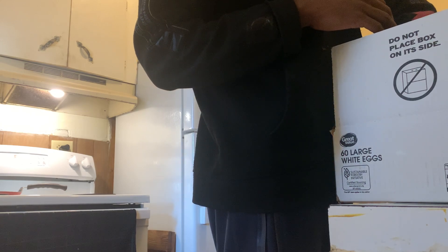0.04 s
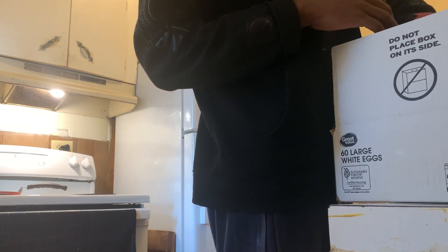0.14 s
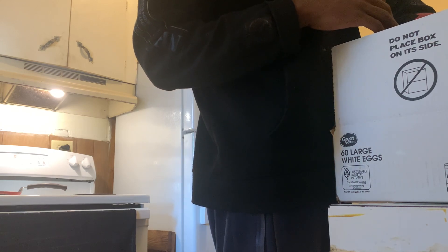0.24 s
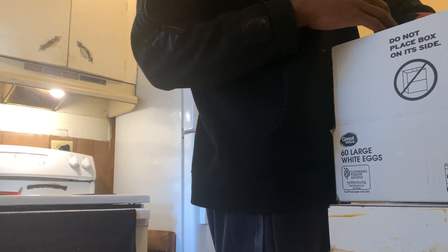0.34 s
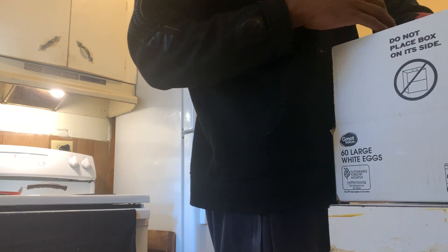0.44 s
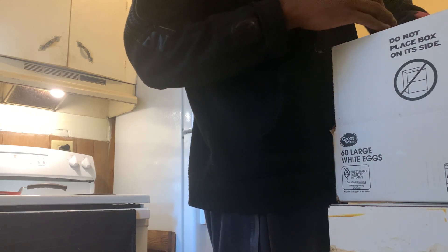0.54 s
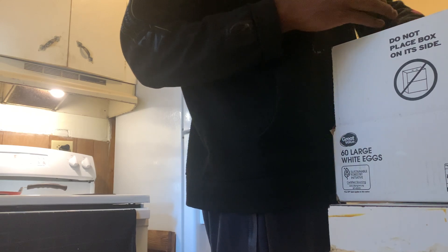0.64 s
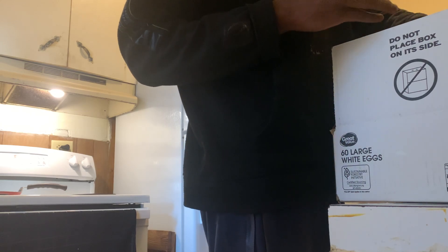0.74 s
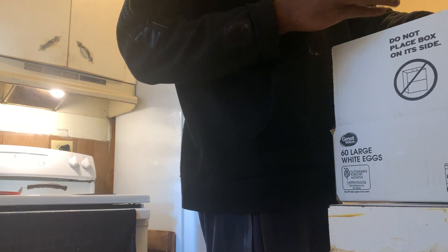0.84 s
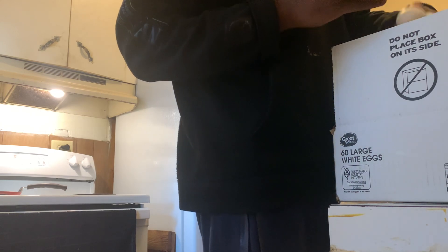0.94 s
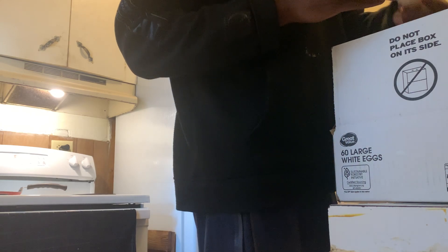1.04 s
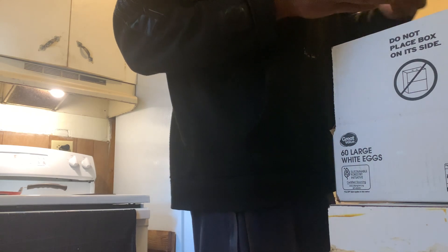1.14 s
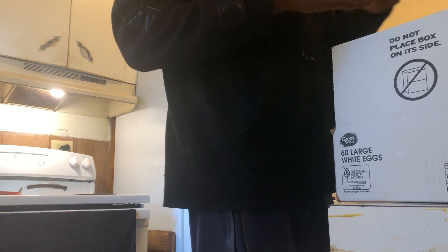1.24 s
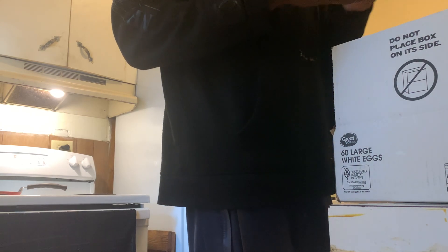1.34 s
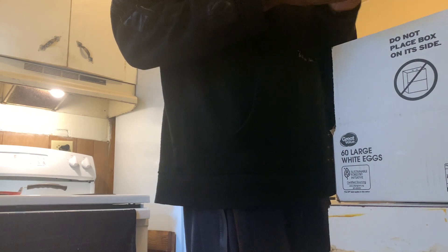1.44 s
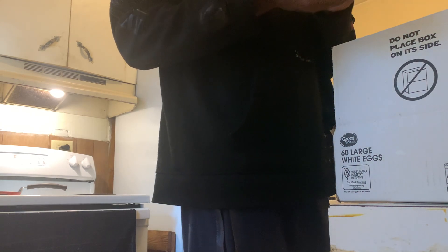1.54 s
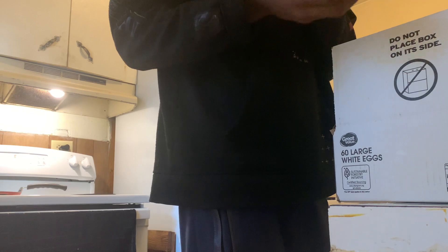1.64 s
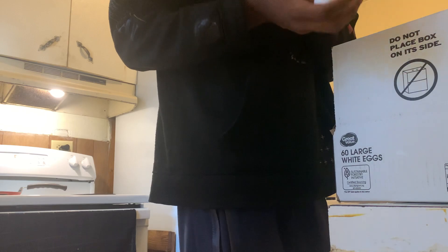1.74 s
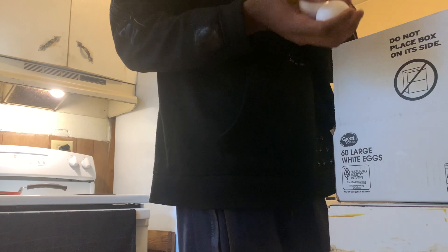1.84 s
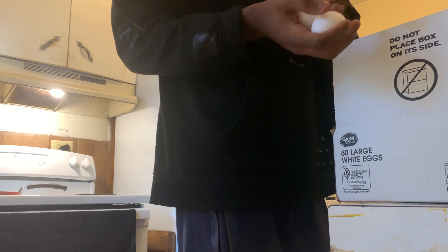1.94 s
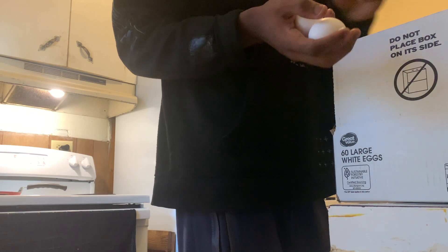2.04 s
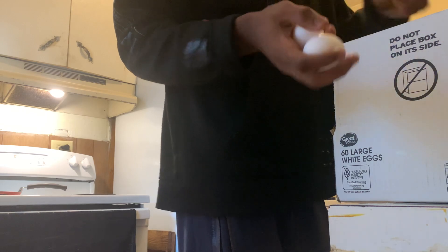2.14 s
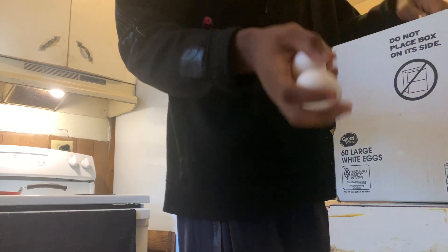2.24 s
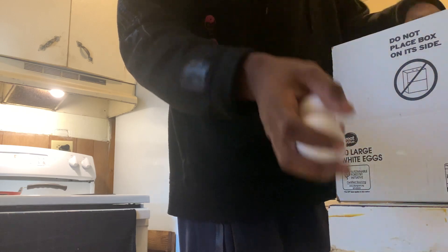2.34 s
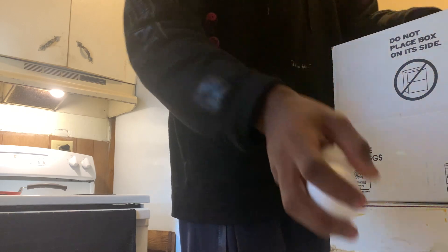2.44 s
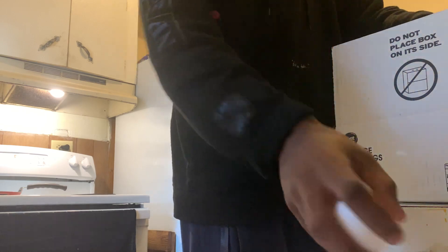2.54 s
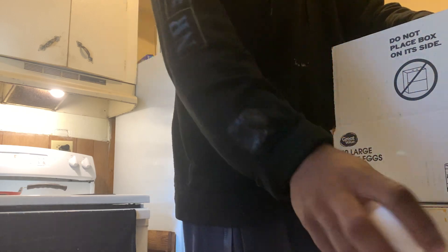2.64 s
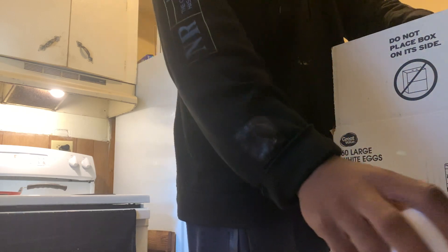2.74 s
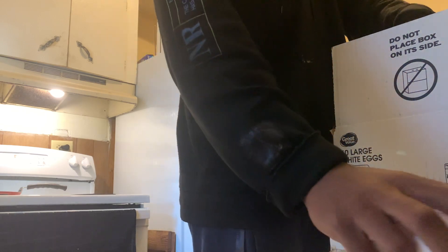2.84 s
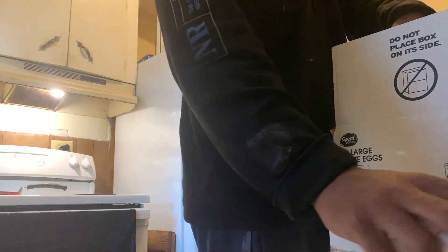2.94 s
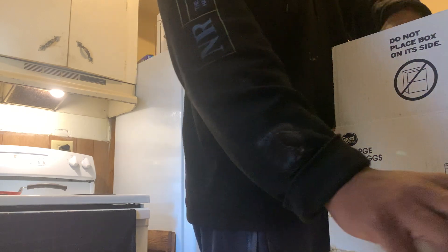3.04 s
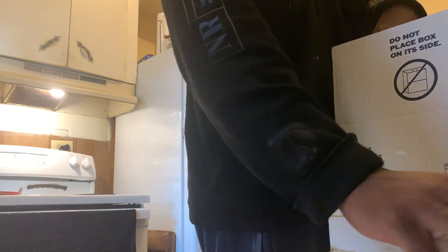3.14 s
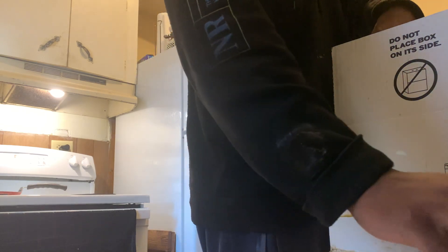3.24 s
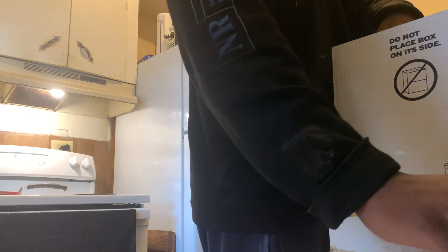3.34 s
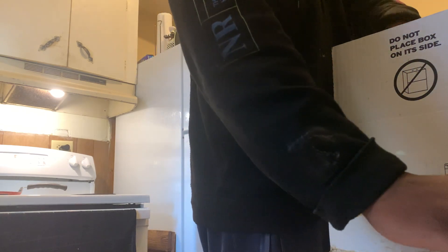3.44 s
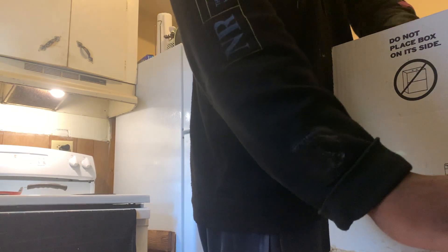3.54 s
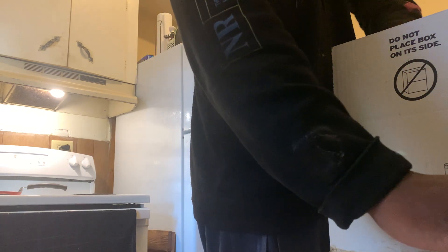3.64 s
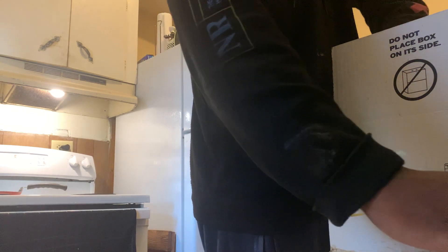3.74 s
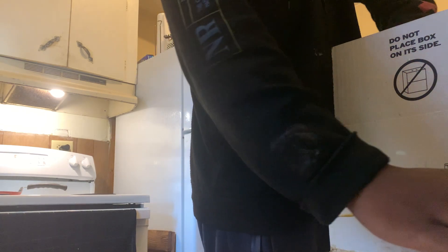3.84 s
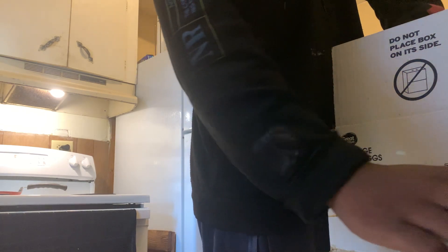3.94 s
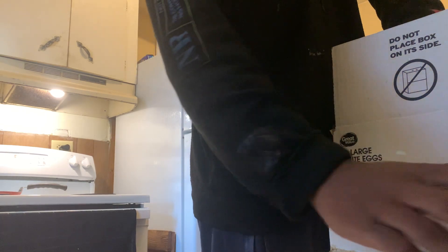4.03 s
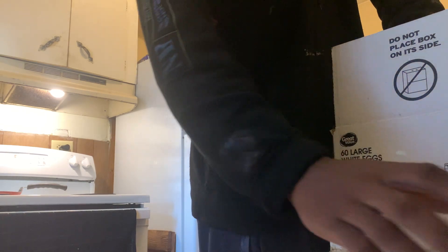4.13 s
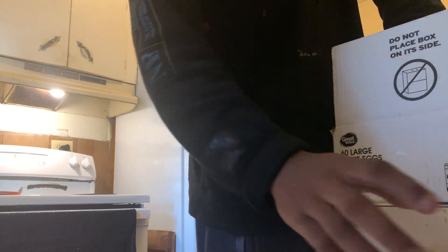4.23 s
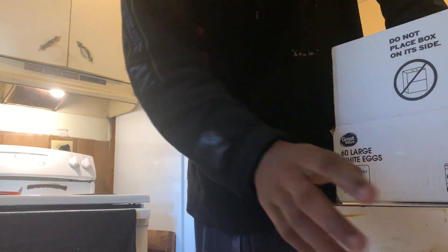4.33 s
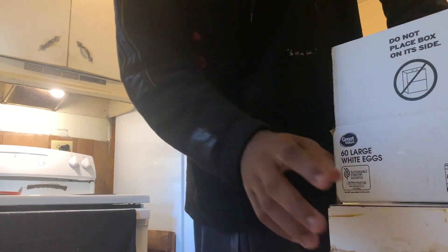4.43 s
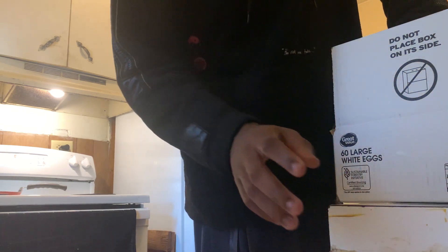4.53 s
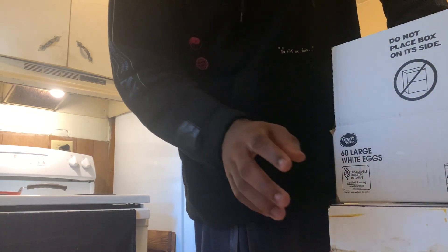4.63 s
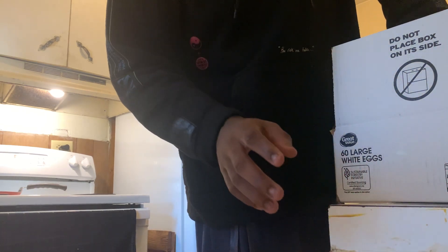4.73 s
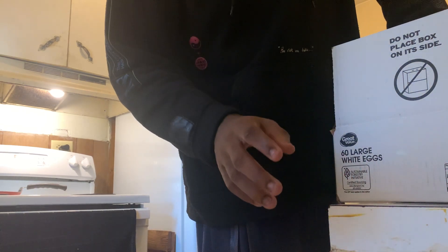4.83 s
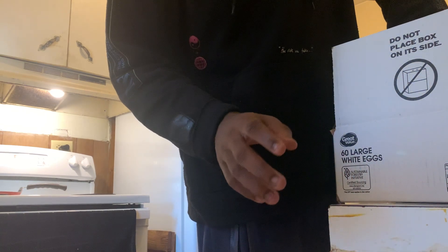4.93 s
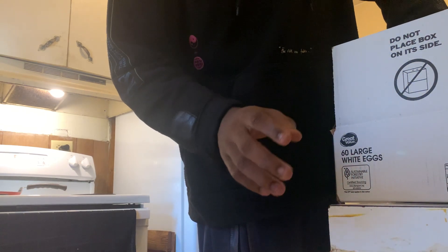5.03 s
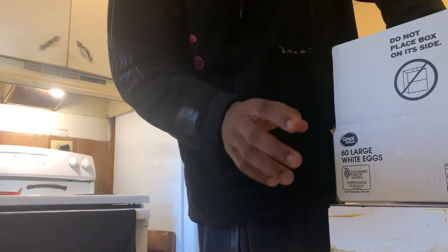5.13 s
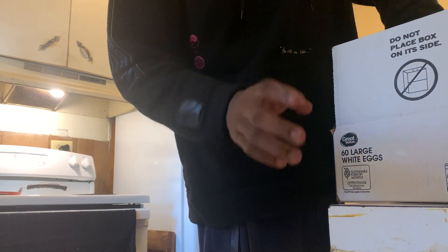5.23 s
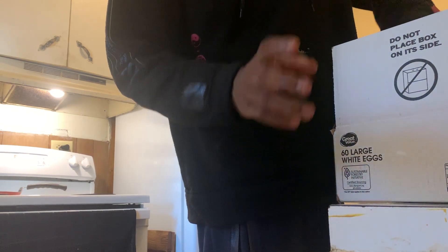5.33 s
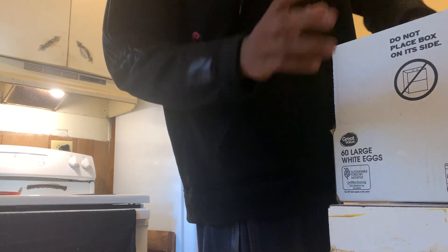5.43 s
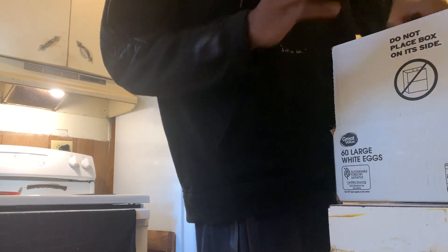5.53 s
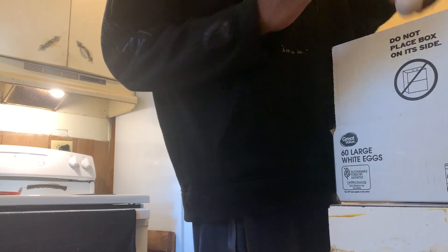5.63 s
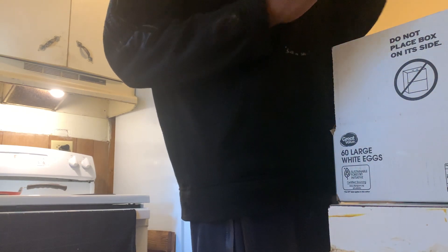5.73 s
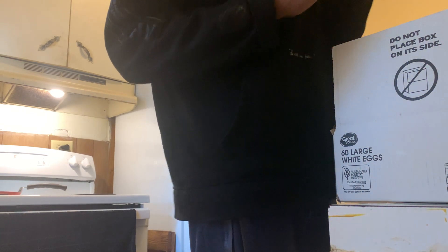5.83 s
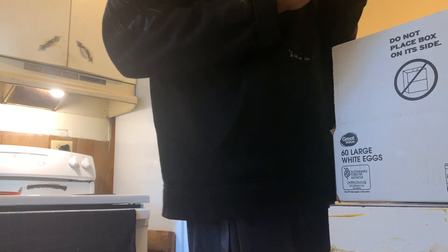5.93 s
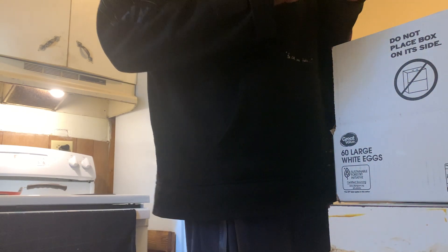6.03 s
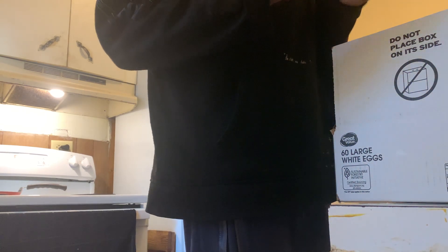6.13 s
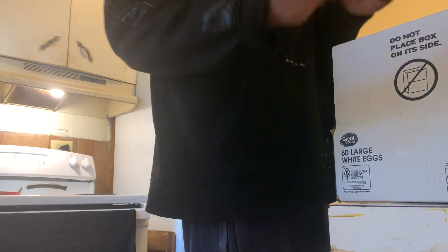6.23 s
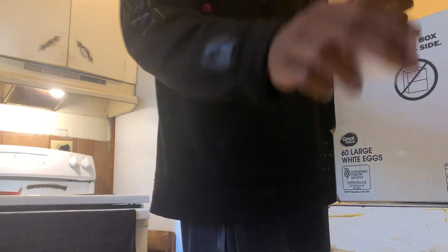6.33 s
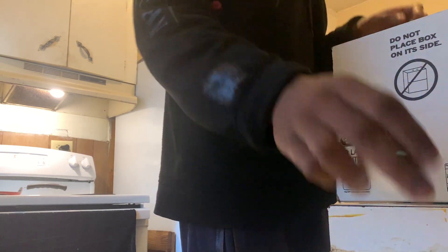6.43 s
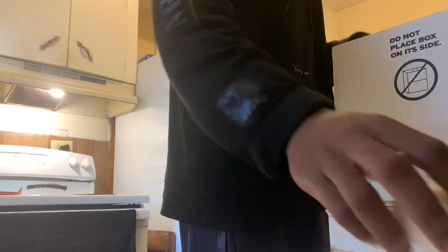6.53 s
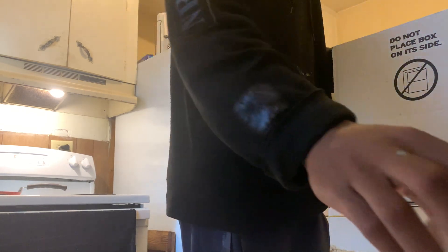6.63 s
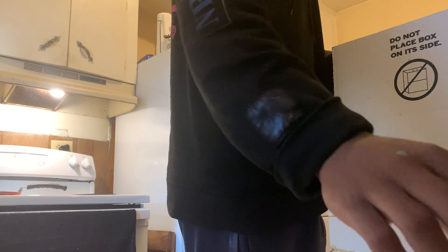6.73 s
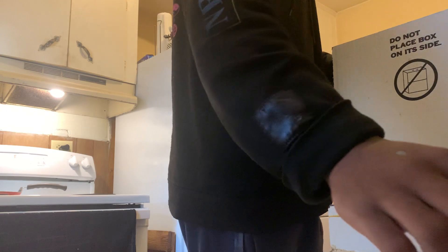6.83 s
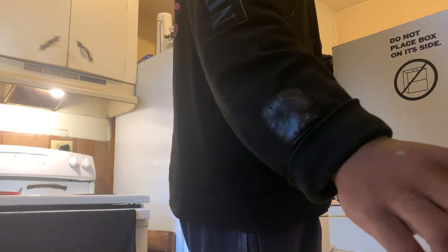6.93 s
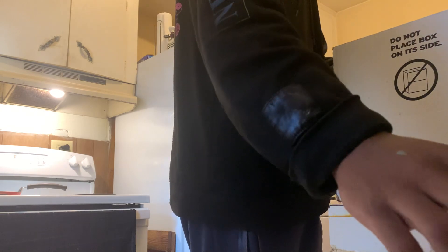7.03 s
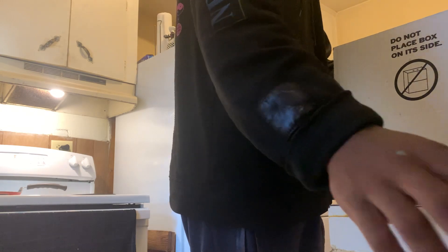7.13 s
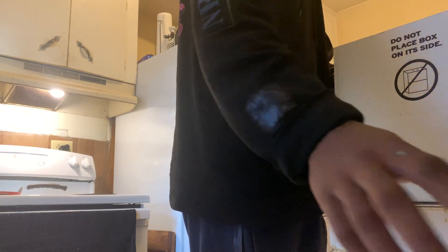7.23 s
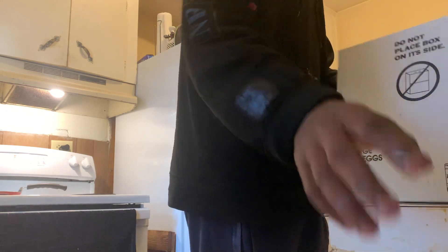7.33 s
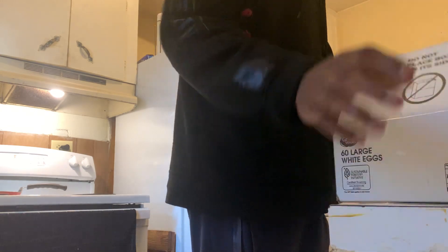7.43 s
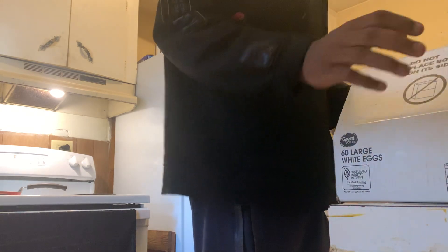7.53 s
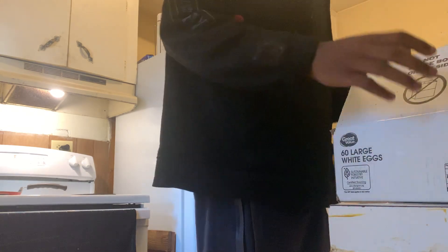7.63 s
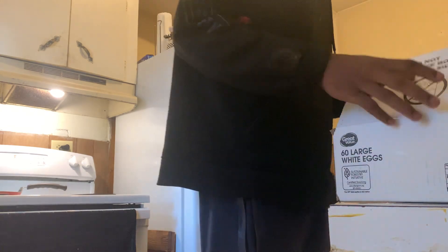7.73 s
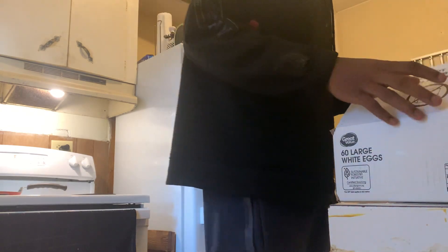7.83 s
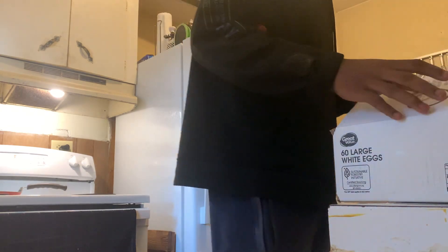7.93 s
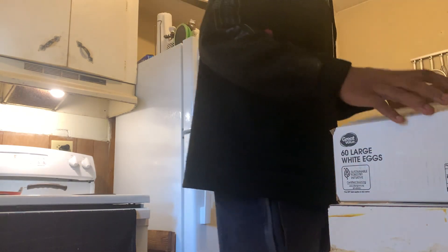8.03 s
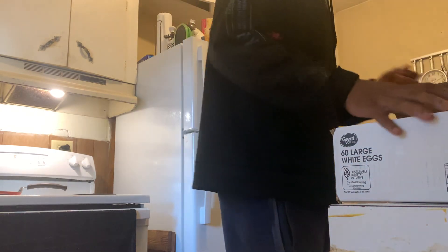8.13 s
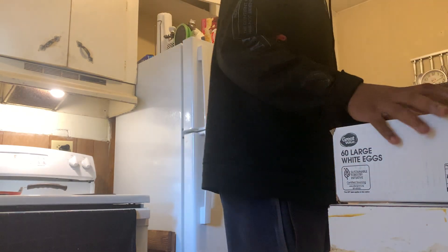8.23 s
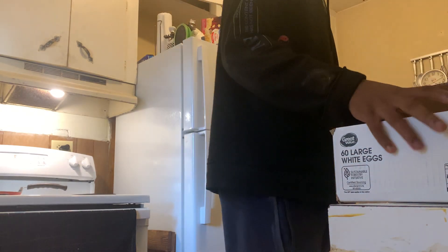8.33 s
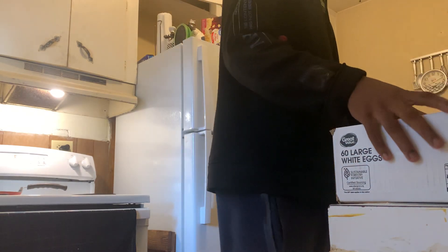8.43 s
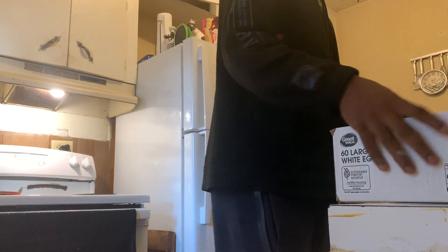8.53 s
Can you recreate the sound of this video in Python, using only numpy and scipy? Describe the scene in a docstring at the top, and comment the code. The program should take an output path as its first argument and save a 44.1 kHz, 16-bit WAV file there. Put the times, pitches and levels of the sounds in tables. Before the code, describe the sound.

Close stereo pickup on a counter, little room echo. Low fridge hum stays underneath. A brief cardboard bump and rustle, near quiet, a tiny eggshell clink, then crisp rubbing with a squeaky groan and a woody egg knock. Soft sleeve and hand brushes fill the middle. A harder knock comes next, followed by coarse scrapes, low cardboard thuds, clicks and a final airy rub.

```python
"""A refrigerator hums throughout in a small kitchen, as wavering sine tones over a soft rush of noise.
From the start, hand, sleeve and shells rub a cardboard egg case close by: gritty noise that swells and dies.
Eggs clink in the hand, then a long groan of nearly regular slips leads to an egg knocking on the counter.
After quieter rubs a second egg knocks harder; both knocks are sets of fading counter tones.
Last, the flaps are folded shut with more rubs, short groans, bumps, clicks and low rumble."""
import sys
import numpy as np
from scipy import signal
from scipy.fft import rfft, irfft
from scipy.io import wavfile
from scipy.ndimage import uniform_filter1d, minimum_filter1d

SR = 44100
rng = np.random.default_rng(int(sys.argv[2]) if len(sys.argv) > 2 else 0)


def int16_out(signal):
    """Quantize to a 16-bit WAV file."""
    q = np.round(np.clip(np.atleast_2d(signal).T, -1, 1) * 32767)
    wavfile.write(sys.argv[1], SR, q.astype(np.int16))


N = 377916
TIME = np.arange(N) / SR  # seconds
FREQS = np.fft.rfftfreq(N, 1 / SR)  # Hz

# Levels in the tables are relative: the functions may add a gain or a wavering.

# Refrigerator tones: [pitch_hz, level_db]
HUM_TONES = [(59.5, -63.5), (91.5, -72.5), (119.6, -58.5), (547, -77)]
# Colour of the room's rush: [frequency_hz, level_db]
ROOM_AIR_COLOUR = [(20, -11.5), (40, -11.5), (62, 2.5), (100, 2.5), (150, -1), (250, -21.5), (550, -18.5),
                   (900, -21.5), (1400, -34.5), (3000, -39.5), (7600, -45.5), (8400, -44), (14000, -40),
                   (16000, -48.5)]
# Likeness of left and right in noisy sound: [frequency_hz, likeness (-1 to 1)]
LEFT_RIGHT_LIKENESS = [(300, 1), (600, 1), (850, 0.93), (1130, 0.3), (1700, 0.28), (2500, .4),
                       (3300, -0.047), (4000, 0.21), (5300, -0.22), (6800, 0.46), (8400, 1), (13000, .94),
                       (16000, .8)]

# Pushes that bend the case and its trays: [start_s, length_s, rumble_db]
CASE_PRESSES = [(0.609, 0.066, -40.5), (0.69, 0.68, -51.5), (2.728, 0.51, -54.5), (2.96, .1, -53),
                (3.528, 0.076, -42.5), (3.688, 0.35, -52.5), (4.115, 0.36, -60.5), (4.752, .65, -64),
                (6.773, 0.4, -43.5), (7.32, 0.18, -42.5), (7.52, 0.085, -50), (7.698, .1, -46.5),
                (7.85, 0.67, -51.5)]
# Colour of the bending: [frequency_hz, level_db]
RUMBLE_COLOUR = [(25, -33.5), (45, 0), (70, 7.5), (110, 0), (190, 0.5), (260, -2), (350, -2), (560, -9),
                 (900, -18), (1400, -32.5), (3000, -67)]
PRESS_ATTACK_S, PRESS_RELEASE_DB_PER_S = 0.0098, 197

# Hand against the case: [start_s, level_db, contact_cutoff_hz, share_of_free_ring_time]
CASE_BUMPS = [(.619, -30.5, 1760, 0.89), (.6352, -23.5, 1390, 1), (.658, -27.5, 1200, 0.83),
              (7.394, -28, 1190, 0.66), (7.4505, -31, 1300, 0.49), (7.7525, -33, 2350, 0.3),
              (7.775, -36, 700, 0.32)]
# Ringing of the case wall: [pitch_hz, level_db, free_time_to_fall_60_db_s]
CASE_MODES = [(82.5, -19.5, 0.2), (209, -2.5, 0.22), (358, -26.5, 0.12), (480, -14, 0.066),
              (598, -13.5, 0.36), (830, -22, 0.053), (1234, -27, 0.3), (1450, -31, 0.17)]

# Fibres snapping as a rub starts or a flap bends: [start_s, start_level_db, time_to_fall_60_db_s]
FIBRE_TICKS = [(.0405, -45.5, 0.021), (.055, -41.5, 0.032), (.612, -41.5, 0.1), (1.43, -66, .08),
               (2.7326, -44, .023), (5.345, -56, 0.042), (5.501, -50, .04), (6.591, -46, 0.05),
               (6.67, -40, .04), (6.769, -28, 0.0061), (7.752, -45, 0.0057), (7.7734, -40, 0.011),
               (7.926, -44, 0.013), (7.95, -42, .014), (7.9985, -33, 0.0073), (8.016, -38, 0.0067)]
# Colour of the snaps: [frequency_hz, level_db]
CLICK_COLOUR = [(600, -13), (1900, -8), (3000, -7), (7400, -6), (10800, 17), (16000, -26)]
# Eggs touching in the hand: [start_s, start_level_db, time_to_fall_60_db_s]
EGG_CLINKS = [(1.8478, -33, 0.021), (1.8688, -35, 0.014), (1.8775, -46, .016), (1.887, -44, .03)]
# Colour of eggshell: [frequency_hz, level_db]
SHELL_COLOUR = [(1200, -19), (1900, -15), (3000, -24), (5200, -1), (7400, -8), (10800, 6.5), (16000, -6)]

# Short scuffs of shell on board: [middle_s, length_s, peak_level_db]
SHELL_SCUFFS = [(2.828, 0.05, -39.5), (2.964, .025, -45.5)]
# Colour of the scuffs: [frequency_hz, level_db]
SCUFF_COLOUR = [(300, -10), (500, 9), (720, -20), (930, 6), (1500, -25), (1850, 9.5), (2300, -29),
                (6000, -27)]

# Long groan before the first egg lands: [time_s, pitch_hz, level_db]
LONG_GROAN_PATH = [(3.17, 378, -40), (3.188, 384.2, -37.5), (3.28, 457.5, -31.5), (3.296, 456.8, -32),
                   (3.354, 365, -26), (3.388, 382.4, -46), (3.42, 373, -40.5), (3.438, 356, -32.5),
                   (3.5, 392, -41)]
# Short stick-slip groans: [middle_s, pitch_hz, level_db]
SHORT_GROANS = [(2.992, 349, -38.5), (3.026, 355.5, -35.5), (3.675, 299, -38), (4.575, 346, -53),
                (6.929, 298, -35.5), (7.157, 350.6, -31.5), (7.353, 398, -33.5), (7.387, 342, -33.5),
                (7.456, 360, -34), (7.588, 319, -34.5), (7.989, 303, -43.5), (8.328, 287, -44.5)]
# Colour of uneven slipping around the groans: [frequency_hz, level_db]
CHATTER_COLOUR = [(210, -29), (320, 1.5), (470, 1), (640, -17.5), (1500, -47)]
LONG_GROAN_GAIN_DB, SHORT_GROAN_S = -0.5, .054
# The long groan swells in regular surges, one of them peaking at SURGE_AT_S
SURGES_PER_S, SURGE_AT_S, SURGE_DB = 28, 3.348, 3.5

# Strokes of hand, sleeve or shell: [start_s, length_s, attack_s, fine_hiss_db, coarse_scrape_db]
RUB_STROKES = [(0.009, 0.038, 0.04, -53, -63), (0.602, 0.073, 0.041, -46.5, -49.5),
               (0.731, 0.055, 0.045, -41.5, -45), (2.619, .11, .012, -61, -76),
               (2.731, 0.22, 0.035, -36.5, -55), (2.948, 0.094, 0.026, -39, -44),
               (3.049, 0.034, 0.0089, -33, -38.5), (3.092, 0.16, 0.015, -43.5, -54),
               (3.261, 0.28, 0.13, -50.5, -54), (3.51, .19, 0.018, -44, -49),
               (3.75, 0.2, 0.016, -65.5, -66.5), (3.89, 0.12, 0.019, -55, -60),
               (4.016, 0.28, 0.13, -52, -70.5), (4.295, 0.063, 0.049, -54, -61),
               (4.603, 0.022, .017, -65, -71), (4.76, 0.071, .035, -68.5, -71),
               (4.965, 0.22, 0.12, -56, -69.5), (5.188, 0.079, 0.026, -75, -65.5),
               (5.338, 0.066, 0.021, -41.5, -53.5), (5.483, 0.049, 0.019, -53, -60),
               (6.444, 0.02, .023, -66, -94), (6.576, 0.038, 0.023, -43.5, -59),
               (6.659, 0.12, 0.0063, -45, -58), (6.765, 0.17, 0.023, -40, -46),
               (6.916, .21, 0.025, -37, -42), (7.199, 0.17, 0.1, -36, -39.5), (7.489, .065, 0.1, -48, -55),
               (7.665, 0.046, .018, -71, -71), (7.753, 0.82, 0.019, -54.5, -64.5),
               (8.106, 0.065, 0.053, -42.5, -63.5), (8.334, 0.1, .018, -47, -59),
               (8.431, 0.19, 0.15, -36.5, -68)]
# Colour of the fine hiss: [frequency_hz, level_db]
HISS_COLOUR = [(5500, -26), (7700, -26.5), (8200, -3.5), (8900, -0.5), (9800, 0), (11500, 1.5),
               (12500, -1.5), (14000, -7), (15200, -13.5), (16000, -53.5)]
# Colour of the coarse scrape: [frequency_hz, level_db]
SCRAPE_COLOUR = [(40, -22), (150, -1), (300, -2), (600, -2), (780, -3.5), (950, 2), (1120, -6),
                 (1270, -8.5), (1800, -6), (2200, -7.5), (3100, -12), (4000, -12), (5200, -15.5),
                 (7200, -10), (10000, -22)]
# Sharp resonances of the scraped board: [pitch_hz, width_hz, lift_db]
BOARD_RESONANCES = [(577, 40, 9.5), (901, 38, 4.5), (1254, 65, 8.5), (1436, 22, 8), (1600, 57, -1),
                    (2116, 46, -3)]
RUB_RELEASE_DB_PER_S = 289
# A hand resting on the case never keeps quite still
RESTING_HISS_DB, RESTING_SCRAPE_DB, RESTING_RUMBLE_DB = -83.5, -83.5, -70

# Egg against counter: [start_s, level_db, contact_cutoff_hz, share_of_free_ring_time]
EGG_KNOCKS = [(3.517, -27, 3620, 0.72), (3.5215, -9.5, 895, 0.54), (3.5405, -18.5, 1080, 0.7),
              (3.552, -27, 1200, 0.47), (3.562, -20, 590, 0.38), (6.7665, -23.5, 2400, 0.87),
              (6.7722, -0.5, 805, 0.8), (6.7802, -17, 950, 0.47)]
# Ringing of the counter top: [pitch_hz, level_db, free_time_to_fall_60_db_s]
COUNTER_MODES = [(143, -9, 0.19), (284, -12.5, 0.21), (379, -13, 0.31), (458, -10.5, 0.15),
                 (500, -0.5, 0.071), (497, -4, 0.019), (604, -12.5, 0.12), (654, -19, 0.083),
                 (716, -19, 0.094), (850, -17.5, 0.077), (1265, -16.5, 0.13), (1690, -8, .06)]

KITCHEN_T60_S, KITCHEN_DB = .28, -13.5
PORT_LAG_S, PORT_ONSET_HZ = .0002, 5850
CUTOFF_HZ = 15850


def from_db(db):
    """Turn decibels into a gain."""
    return 10 ** (np.asarray(db) / 20)


def rms_one(x):
    """Scale to an average power of 1."""
    return x / np.sqrt(np.mean(x ** 2) + 1e-20)


def over_freqs(points):
    """Read a table at every frequency, on a log-frequency axis."""
    hz, value = np.transpose(points)
    return np.interp(np.log(FREQS + 1), np.log(hz), value)


def butter(x, hz, kind, order=2):
    """Low- or high-pass filter that uses only present and past sound."""
    sections = signal.butter(order, min(hz, .45 * SR), kind, fs=SR, output="sos")
    return signal.sosfilt(sections, x + 1e-18)


def drift(rate_hz):
    """Smooth random wandering with spread 1; a higher rate wanders faster."""
    noise = rfft(rng.standard_normal(N))
    return rms_one(irfft(noise / (1 + (FREQS / rate_hz) ** 2), N))


def add(out, s, sound):
    """Mix a short sound in at time s."""
    start = max(round(s * SR), 0)
    out[start:start + len(sound)] += sound[:max(N - start, 0)]


def coloured(spectrum, grain=1, resonance_db=0):
    """Stereo noise of rms 1: its driving noise is weighted by grain, then rings through a spectrum."""
    noise = rfft(rng.standard_normal((2, N)) * grain)
    mid, side = noise * from_db(over_freqs(spectrum) + resonance_db)
    side = side * np.minimum(FREQS / 450, 1) ** 2   # long waves reach both microphone ports alike
    alike = np.clip(over_freqs(LEFT_RIGHT_LIKENESS), -1, 1)
    shared = np.sqrt(1 + alike) * mid
    opposed = np.sqrt(1 - alike) * side * [[1], [-1]]
    return rms_one(irfft(shared + opposed, N))


def mode_ripple(count=330):
    """Crowded small modes make a response rise and fall at random along frequency; spread 1."""
    return rms_one(np.interp(FREQS, np.linspace(0, SR / 2, count), rng.standard_normal(count)))


def lagged(x, lag_s, onset_hz):
    """Above the onset the left microphone port lags the right."""
    lag = 2 * np.pi * lag_s * np.maximum(FREQS - onset_hz, 0)  # phase in radians
    return irfft(rfft(x) * np.exp(.5j * lag * np.array([[-1], [1]])), N)


def contacts_db(rows, release_db_per_s, resting_db):
    """Level of overlapping contacts: each swells with pressure, then dies away; their powers add."""
    power = np.full(N, from_db(resting_db) ** 2)
    t = np.arange(2 * SR) / SR
    for start, length, attack_s, db in rows:
        swell = np.minimum(t / attack_s, 1)
        release = from_db(db - release_db_per_s * np.maximum(t - length, 0))
        add(power, start, (swell * release) ** 2)
    return 10 * np.log10(power)


def background(air_db=-56, waver_db=4.5):
    """The refrigerator's wavering hum, made of sine tones, over the low rush of the room."""
    hum = np.zeros(N)
    for hz, db in HUM_TONES:
        level = from_db(db + waver_db * drift(1.7))
        hum += level * np.sqrt(2) * np.sin(2 * np.pi * hz * TIME + rng.uniform(0, 2 * np.pi))
    return hum + from_db(air_db) * coloured(ROOM_AIR_COLOUR)


def flexing(lump_db=2.0, gain_db=3.0):
    """Pushed board gives way in small lumps and rumbles."""
    rows = [(start, length, PRESS_ATTACK_S, db) for start, length, db in CASE_PRESSES]
    level_db = contacts_db(rows, PRESS_RELEASE_DB_PER_S, RESTING_RUMBLE_DB)
    return from_db(level_db + gain_db) * coloured(RUMBLE_COLOUR, from_db(lump_db * drift(34)))


def blows(table, modes, crack_db, low_cut_hz):
    """Blows ring modes; soft contact dulls them, a holding hand shortens them, bass radiates poorly."""
    out, t = np.zeros(N), np.arange(SR // 2) / SR
    for s, db, contact_hz, free in table:
        ring = np.zeros(len(t))
        for hz, level, t60 in modes:
            ring += from_db(level - 60 * t / (t60 * free)) * np.cos(2 * np.pi * hz * t)
        crack = from_db(crack_db - 60 * t / 0.11) * rng.standard_normal(len(t))   # many short high modes
        add(out, s, from_db(db) * butter(ring + crack, contact_hz, "low", order=4))
    return butter(out, low_cut_hz, "high")


def case_bumps():
    """The hand bumps the case and its wall rings."""
    return blows(CASE_BUMPS, CASE_MODES, crack_db=-12, low_cut_hz=30)


def ticks(table, spectrum):
    """Clicks of coloured noise that start at once and fade quickly."""
    envelope, t = np.zeros(N), np.arange(SR // 5) / SR
    for s, db, t60 in table:
        add(envelope, s, from_db(db - 60 * t / t60))
    return envelope * coloured(spectrum)


def fibre_snaps():
    """Cardboard fibres snap with bright clicks."""
    return ticks(FIBRE_TICKS, CLICK_COLOUR)


def shell_clinks():
    """Eggs touch in the hand and their shells click."""
    return ticks(EGG_CLINKS, SHELL_COLOUR)


def scuffs():
    """Brief grazing strokes of shell on board excite a few resonances."""
    envelope = np.zeros(N)
    for s, length, db in SHELL_SCUFFS:
        add(envelope, s - length / 2, from_db(db) * signal.windows.hann(int(length * SR)))
    return envelope * coloured(SCUFF_COLOUR)


def slips(hz, swell, jitter=0.078, octave_db=-19, third_db=-32):
    """A run of nearly regular slips: a wavering pitch with two overtones."""
    waver = rms_one(butter(rng.standard_normal(len(swell)), 110, "low"))
    phase = 2 * np.pi * np.cumsum(hz * (1 + jitter * waver)) / SR
    wave = np.sin(phase) + from_db(octave_db) * np.sin(2 * phase) + from_db(third_db) * np.sin(3 * phase)
    return np.sqrt(2) * swell * wave


def groans(shimmer_db=2.54):
    """One long gliding, surging groan and many short ones that swell and die within a few cycles."""
    times, pitch, level_db = np.transpose(LONG_GROAN_PATH)
    sliding = (TIME > times[0]) & (TIME < times[-1])
    surge_db = SURGE_DB * np.cos(2 * np.pi * SURGES_PER_S * (TIME - SURGE_AT_S))
    long_level = from_db(np.interp(TIME, times, level_db) + LONG_GROAN_GAIN_DB + surge_db)
    out = slips(np.interp(TIME, times, pitch), sliding * long_level)
    swell = signal.windows.tukey(int(SHORT_GROAN_S * SR), .8)
    for s, hz, db in SHORT_GROANS:
        add(out, s - SHORT_GROAN_S / 2, slips(hz, from_db(db) * swell))
    return out * from_db(shimmer_db * drift(82))


def stick_slip(chatter_db=-11, spread_s=0.14):
    """Before, between and after the regular runs the contact slips unevenly."""
    runs = groans()
    nearby_power = uniform_filter1d(runs ** 2, int(spread_s * SR))
    activity = np.sqrt(np.maximum(nearby_power, 0))
    return runs + from_db(chatter_db) * activity * coloured(CHATTER_COLOUR)


def wandering(spectrum, grain, lift_db, ripple_db, wander_hz, count=3):
    """The contact wanders between spots of the board, each of which drives other small modes."""
    shares = [np.exp(2 * drift(wander_hz)) for spot in range(count)]
    sound = np.zeros((2, N))
    for share in shares:
        sound += share * coloured(spectrum, grain, lift_db + ripple_db * mode_ripple())
    return sound / np.linalg.norm(shares, axis=0)  # keeps the power steady


def moving_echo(x, path_s=.0026, swing=0.2144, echo_db=-6):
    """The bounce off the counter lengthens and shortens as the arm moves, sweeping a comb through the sound."""
    delay = path_s * np.exp(swing * drift(.6))
    echo = np.array([np.interp(TIME - delay, TIME, channel) for channel in x])
    return x + from_db(echo_db) * echo


def rubbing(grit_db=2.5, catch_db=1.0, hiss_gain_db=1.0, scrape_gain_db=4.5,
            hiss_ripple_db=4.0, ripple_db=3.0, firm_db=-45, brightening=0.069):
    """Fibres catch and let go: fine hiss and coarse scrape share the grit; a lighter touch scrapes duller."""
    start, length, attack_s, hiss_levels, scrape_levels = np.transpose(RUB_STROKES)
    hiss_rows = zip(start, length, attack_s, hiss_levels)
    scrape_rows = zip(start, length, attack_s, scrape_levels)
    hiss_db = contacts_db(hiss_rows, RUB_RELEASE_DB_PER_S, RESTING_HISS_DB)
    scrape_db = contacts_db(scrape_rows, RUB_RELEASE_DB_PER_S, RESTING_SCRAPE_DB)
    grain = from_db(grit_db * drift(1000) + catch_db * drift(70))
    hiss = coloured(HISS_COLOUR, grain, hiss_ripple_db * mode_ripple())

    board_db = sum(lift / (1 + (2 * (FREQS - hz) / width) ** 2) for hz, width, lift in BOARD_RESONANCES)
    scrape = moving_echo(wandering(SCRAPE_COLOUR, grain, board_db, ripple_db, wander_hz=3.66))
    dull = irfft(rfft(scrape) / (1 + (FREQS / 2700) ** 4), N)
    bright = scrape - dull
    scrape = dull + from_db(brightening * (scrape_db - firm_db)) * bright
    return from_db(hiss_db + hiss_gain_db) * hiss + from_db(scrape_db + scrape_gain_db) * scrape


def egg_knocks(knock_lag_s=0.00028):
    """Eggs knock on the counter top and ring it, the left side lagging above the bass."""
    knocks = blows(EGG_KNOCKS, COUNTER_MODES, crack_db=1.0, low_cut_hz=210)
    return lagged(knocks, knock_lag_s, onset_hz=620)


def kitchen(x):
    """Diffuse echoes of the small room, alike on both sides in the bass."""
    t = np.arange(SR // 2) / SR
    fading = from_db(-60 * t / KITCHEN_T60_S) * (t > .004)
    mid, side = rng.standard_normal((2, len(t))) * fading
    tail = mid + .6 * butter(side, 550, "high") * np.array([[1], [-1]])
    tail = tail / np.linalg.norm(tail[0])
    return from_db(KITCHEN_DB) * signal.fftconvolve(x, tail, axes=1)[:, :N]


def scene(counter_room_db=-6, case_room_db=3, tick_room_db=3, shell_room_db=7):
    """The counter is close and dry; the case and the clicks reach further into the room."""
    counter = egg_knocks() + stick_slip() + scuffs()
    case, snaps, shells = case_bumps(), fibre_snaps(), shell_clinks()
    into_room = from_db(counter_room_db) * counter + from_db(case_room_db) * case
    into_room = into_room + from_db(tick_room_db) * snaps + from_db(shell_room_db) * shells
    near = counter + case + snaps + shells
    return near + kitchen(into_room) + rubbing() + flexing() + background()


def record(dry):
    """A fast limiter holds the peaks, the two ports drift out of step in the treble, and the top is cut."""
    allowed = np.minimum(.89 / (np.abs(dry).max(axis=0) + 1e-9), 1)
    limited = dry * uniform_filter1d(minimum_filter1d(allowed, size=260), size=260)
    limited = limited * signal.windows.tukey(N, .001)  # very short fades at both ends
    top = 1 / np.sqrt(1 + (FREQS / CUTOFF_HZ) ** 240)
    return irfft(rfft(lagged(limited, PORT_LAG_S, PORT_ONSET_HZ)) * top, N)


dry = scene()
out = record(dry)
int16_out(out)
```